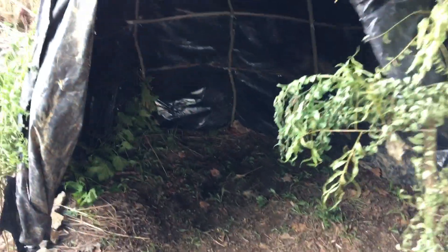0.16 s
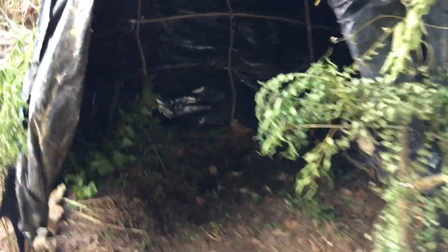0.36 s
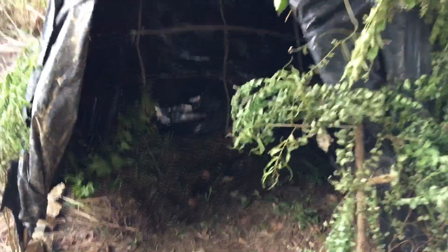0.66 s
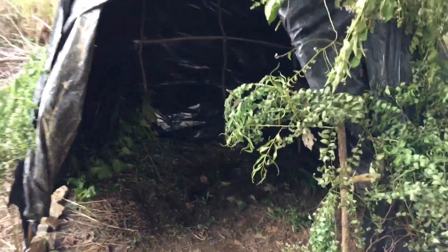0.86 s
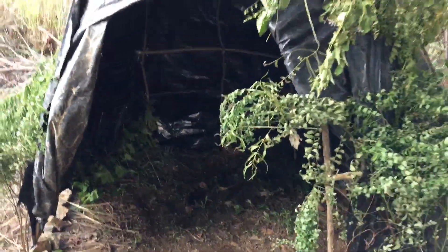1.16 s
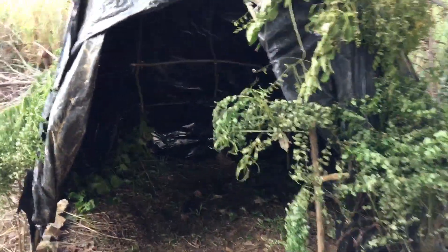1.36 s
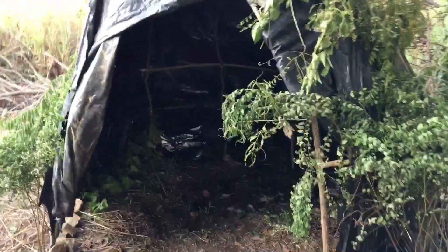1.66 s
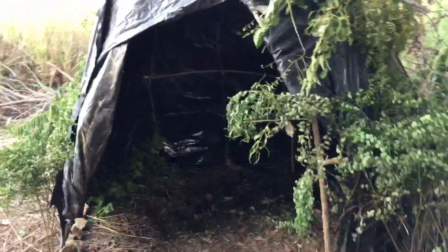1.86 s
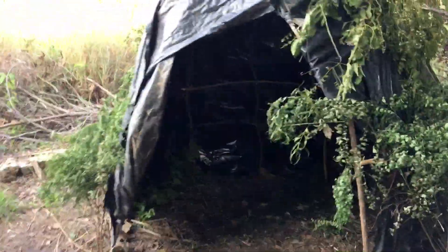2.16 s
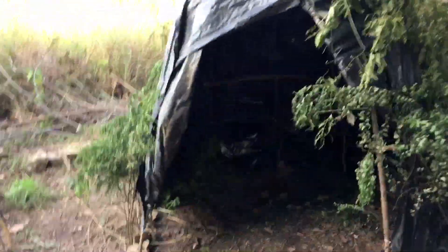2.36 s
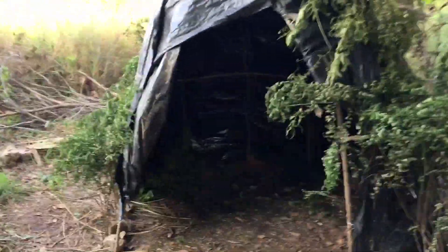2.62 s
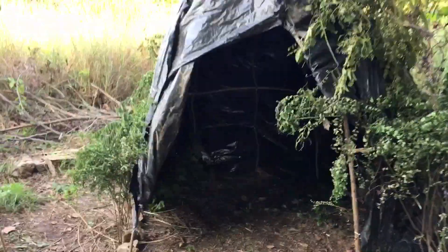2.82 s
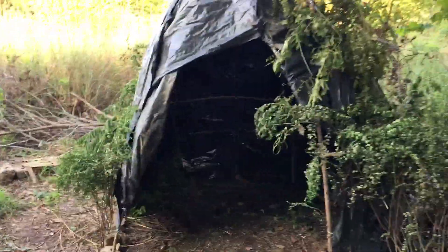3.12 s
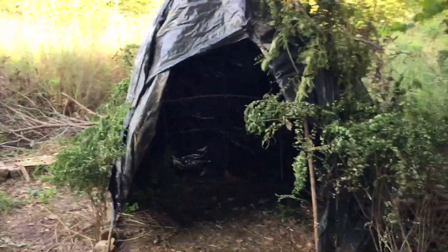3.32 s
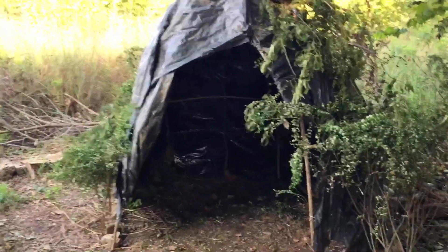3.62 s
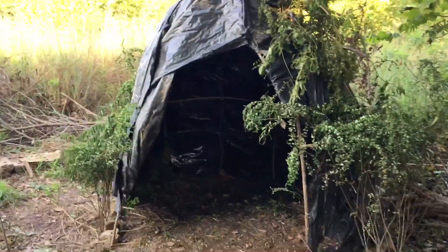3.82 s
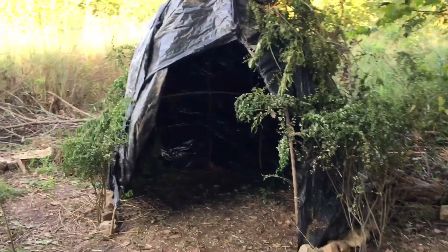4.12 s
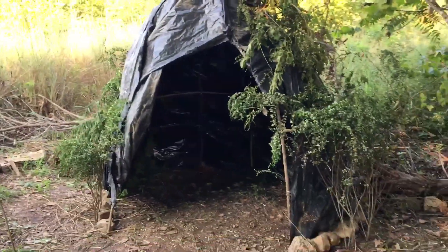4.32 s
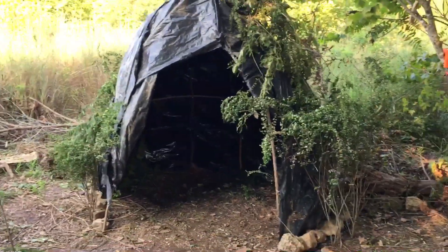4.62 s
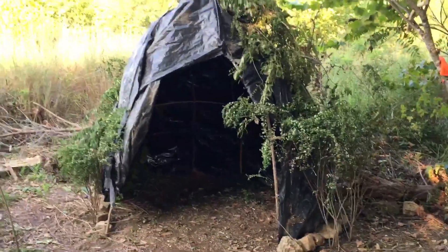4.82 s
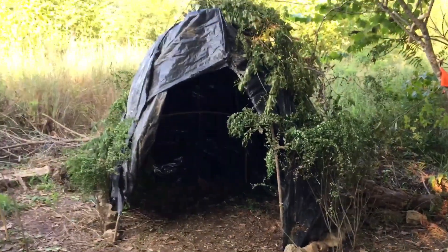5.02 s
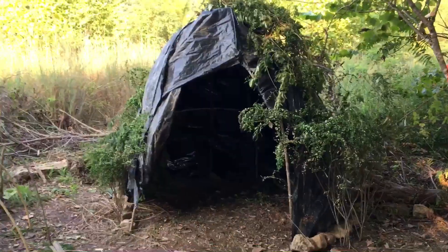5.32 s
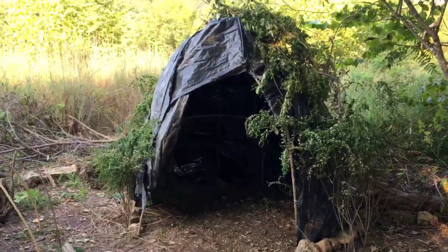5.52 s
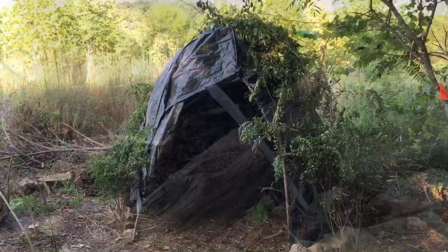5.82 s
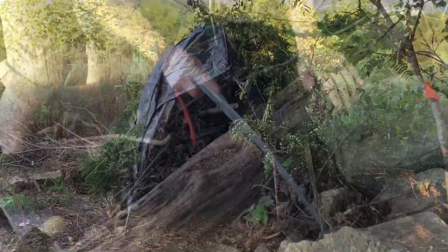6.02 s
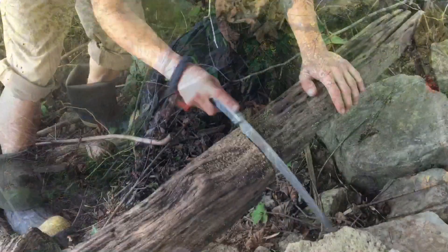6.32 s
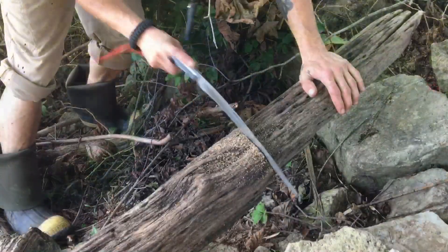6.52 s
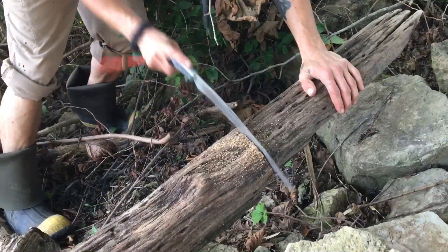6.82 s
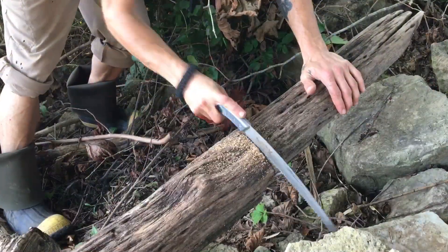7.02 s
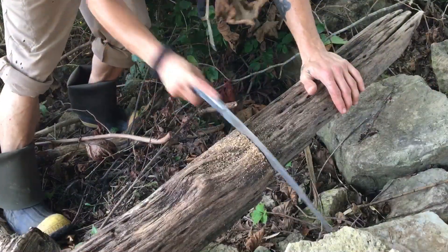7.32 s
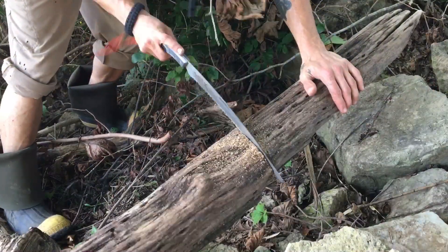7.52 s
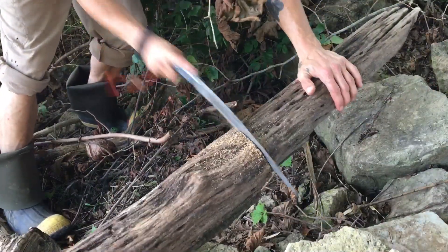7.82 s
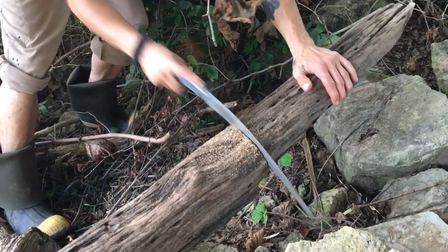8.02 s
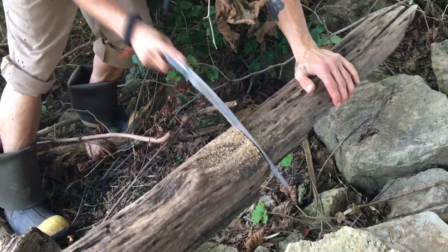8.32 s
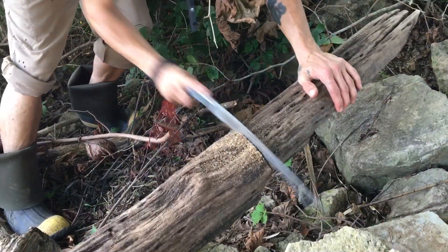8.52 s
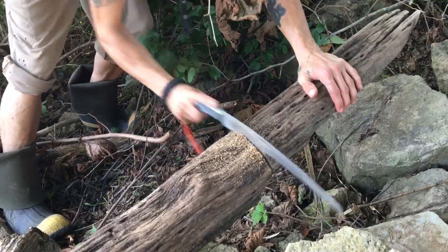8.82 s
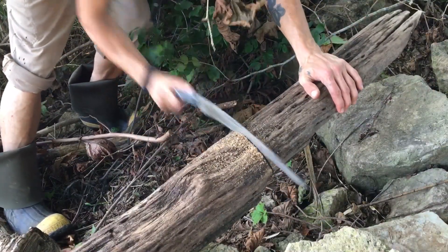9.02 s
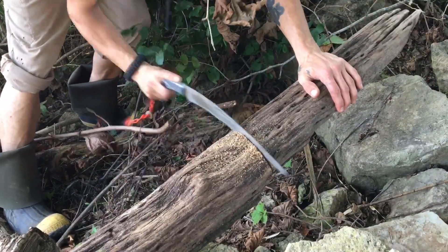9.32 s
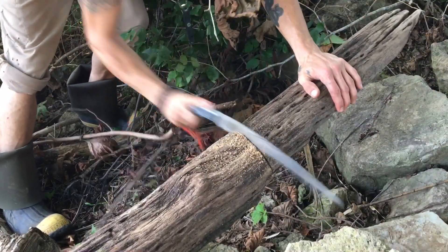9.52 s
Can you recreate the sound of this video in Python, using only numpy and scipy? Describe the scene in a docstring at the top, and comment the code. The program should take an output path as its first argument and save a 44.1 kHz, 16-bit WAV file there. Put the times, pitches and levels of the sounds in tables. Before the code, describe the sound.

A small mono microphone outdoors by a lake, little deep bass. From 0 s a shrill, steady insect chorus around 7 kHz lies over soft air rumble; dry plants swish at the start, and a breeze stirs far trees. Irregular footfalls clack on sticks and stones, clustered near 1.7 s, with dull soil thuds at 2 to 3 s. A sharp leafy swish comes at 2.45 s, a smaller one at 3.55 s. Faint hoarse birds call between 1 and 3 s. A far engine revs gently near 2.9 s, higher near 4 s, then fades. Sticks snap underfoot around 5.05 s. At 5.7 s fast sawing begins abruptly and continues to the end at about 9.6 s: strong pulls, weaker pushes, nearly six single strokes a second, gritty wood rasp, bright blade hiss, trickling sawdust, brief chattering catches and knocks, notably at 7.1 and 8.5 s. Insects and a faint low motor drone continue beneath.

```python
"""Insects shrill and dry undergrowth swishes close by: someone steps back outdoors by a lake, a far engine revs.
From 5.7 s a curved hand saw works through a weathered log, nearly three strokes there and back a second.
Teeth and torn fibres ring the log and hiss off the blade; now and then the blade knocks in the kerf.
Shaped noise, short bursts and resonances make the saw, steps, plants, insects and air; sines make the motors.
A small microphone takes it all in on one channel, without the deepest bass and the very top."""
import sys
import numpy as np
from scipy import signal
from scipy.fft import rfft, irfft
from scipy.io import wavfile
from scipy.ndimage import map_coordinates

SR = 44100
rng = np.random.default_rng(int(sys.argv[2]) if len(sys.argv) > 2 else 0)


def wav_record(signal):
    """Record a signal, one row per channel, as 16-bit PCM in the file named by sys.argv[1]."""
    frames = np.transpose(np.atleast_2d(signal))
    bounded = np.clip(frames, -1, 1)
    # unit amplitude maps onto the largest positive 16-bit level
    quanta = np.round(bounded * 32767).astype(np.int16)
    wavfile.write(sys.argv[1], SR, quanta)


N = 426006
T = np.arange(N) / SR

# Levels in the tables are those fed in, ahead of the mix gains and the microphone.
# Saw strokes, pull and push in turn: start t/s, length t/s, rasp level/dB, hiss over rasp level/dB
STROKES = [(5.68, 0.15, -35.0, 0), (5.874, 0.163, -41.5, 0.5), (6.056, 0.18, -37.0, -1.6),
           (6.263, 0.15, -36.5, -1.5), (6.418, 0.157, -31.0, -0.8), (6.598, 0.16, -37.5, -2),
           (6.753, 0.18, -32.0, -0.9), (6.965, 0.14, -34.5, -2), (7.144, 0.14, -30.5, -0.6),
           (7.312, 0.14, -38, -3.5), (7.453, 0.15, -32, -2), (7.64, 0.16, -36, -3.5),
           (7.823, 0.15, -31.5, -3), (8.019, 0.15, -39.5, -4), (8.22, 0.15, -34.5, -3.5),
           (8.4, 0.134, -34.5, -1.7), (8.543, 0.171, -30.0, -2.5), (8.718, 0.15, -38.0, 0),
           (8.886, 0.15, -30.0, -3.0), (9.064, 0.16, -37.5, 3.5), (9.235, 0.17, -31.5, 1.5),
           (9.407, 0.16, -36.5, 2.0), (9.571, 0.17, -30.5, -1)]
# Blade knocks in the kerf as it turns: t/s, level/dB, ring f/Hz, gain of that ring level/dB
KNOCKS = [(5.674, -38, 8900, 27), (5.705, -39, 2600, 4), (7.114, -29.5, 4190, 17), (7.803, -40.5, 4320, 5),
          (8.524, -22, 2435, -7), (8.752, -43, 11500, 24)]
# Teeth catch on hard wood and the blade chatters: t/s, length t/s, f/Hz, level/dB
CATCHES = [(6.465, 0.027, 1553, -34), (7.168, 0.0088, 1091, -31.5), (7.18, 0.032, 1795, -26.5),
           (7.858, 0.043, 2045, -29.5), (8.27, 0.031, 2082, -35), (8.596, 0.015, 1800, -28),
           (8.988, 0.031, 997, -34.5), (9.285, 0.027, 1505, -32)]
# Ringing of log and blade: f/Hz, width f/Hz, level over the broad response/dB
SAW_MODES = [(389, 61, 1), (815, 83, -1), (991, 63, 6), (1360, 58, -9), (1900, 67, -7), (2600, 44, -3),
             (3570, 24, 3.5), (3930, 103, -1), (4500, 160, -10), (5740, 270, -7.5), (8320, 680, -8),
             (9550, 280, -11)]
# Broad response of the log, then of the blade: f/Hz, relative level/dB
LOG_RESPONSE = [(120, -16.5), (220, -6.5), (370, -5.5), (560, -7.5), (900, -6), (1200, -6.5), (1480, -0.5),
                (2100, -2.5), (2800, -3), (3600, -8), (5000, -17.5), (15000, -54)]
BLADE_RESPONSE = [(1200, -37), (3000, -9.5), (4200, -0.5), (5000, -3), (6300, 3.5), (8000, -2), (9400, 2.5),
                  (10400, -1), (11500, 3.5), (15500, -4)]
# Tone of the sawdust: f/Hz, relative level/dB; then its course: t/s, level/dB
DUST_TONE = [(200, -3.0), (1500, 1.0), (4000, -4.0), (15000, -6)]
DUST_COURSE = [(5.7, -52.5), (6.4, -52), (7.6, -53.5), (9.6, -49)]
# Footfalls on loose sticks and stones: t/s, level/dB, centre f/Hz, width f/Hz, decay t/s
STEPS = [(0.186, -53, 1200, 1500, .006), (0.436, -39.5, 745, 1400, 0.0022), (0.571, -50, 685, 630, 0.018),
         (0.597, -45, 2400, 1800, 0.0039), (1.012, -48.5, 600, 600, 0.0056), (1.566, -50, 530, 700, 0.027),
         (1.723, -34, 740, 900, 0.0024), (1.752, -37.5, 706, 1090, 0.0036),
         (1.768, -37.5, 680, 1000, 0.0032), (1.788, -36.5, 700, 1000, 0.0024),
         (1.953, -42, 360, 400, 0.0087), (2.363, -51, 670, 300, 0.011), (2.795, -44.5, 1160, 1000, 0.0042),
         (2.843, -34.5, 604, 190, 0.0091), (3.053, -48.5, 2900, 3000, 0.0068),
         (3.128, -38.5, 647, 190, .005), (3.181, -41.5, 2800, 1400, 0.0043),
         (3.843, -51.5, 1070, 300, 0.0054), (4.004, -49, 2680, 700, 0.0034),
         (4.064, -45.5, 2500, 1500, 0.0037), (4.142, -47.5, 540, 348, 0.018),
         (4.725, -43.5, 695, 250, 0.0068), (4.804, -47, 754, 348, 0.0075), (4.97, -48, 650, 600, 0.0078),
         (5.03, -34.5, 860, 2200, 0.0064), (5.096, -33.5, 550, 900, 0.012), (5.143, -44.5, 706, 990, .016)]
# Heavy footing on soil: t/s, level/dB, starting f/Hz
THUDS = [(1.958, -41, 125), (2.419, -36, 65), (2.85, -46.5, 250), (3.111, -45.5, 190), (5.031, -47.5, 256),
         (5.099, -52, 300), (5.746, -39, 186), (5.976, -38, 160), (6.01, -38, 130), (7.994, -40.5, 200)]
# Dry sticks snap underfoot: t/s, level/dB, decay t/s
SNAPS = [(5.029, -40.5, 0.013), (5.096, -38.5, 0.013)]
# Tone of a snapping stick: f/Hz, relative level/dB
STICK_TONE = [(200, 6), (900, -7), (3500, 0), (6000, -8.0), (10000, -5.5), (15500, -9)]
# Dry plants swish past the legs: peak t/s, level/dB, rise t/s, fall t/s
SWISHES = [(.03, -53.5, .2, 0.082), (.42, -64.5, 0.017, .012), (.61, -70, 0.045, .05),
           (.98, -69, .025, 0.066), (1.84, -63, 0.059, 0.085), (2.447, -42.5, 0.029, 0.033),
           (2.7, -68, 0.057, 0.12), (2.85, -66, 0.075, 0.068), (3.33, -65, 0.26, 0.11),
           (3.555, -51.5, .07, 0.032), (4.08, -65.5, 0.052, 0.083), (4.26, -64, 0.061, 0.077),
           (4.44, -62.5, 0.082, 0.064), (5.04, -61, .01, .025), (5.11, -61, .015, 0.042)]
# Tone of the dry leaves: f/Hz, relative level/dB
LEAF_TONE = [(150, 1), (500, -3.5), (1200, -3), (2400, 1), (4000, -1), (6500, -1.5), (10000, -7),
             (15500, -13)]
# Fine grass heads whisk past: t/s, length t/s, f/Hz, level/dB
WHISKS = [(0, 0.18, 12500, -55.5), (4.002, .012, 12500, -55), (4.04, .045, 12500, -63),
          (4.38, 0.14, 12000, -57)]
# Mid-pitched bands of noise that swell within the swishes: t/s, length t/s, f/Hz, level/dB
SWISH_BANDS = [(0, 0.089, 1480, -52), (1.81, .07, 3740, -62), (2.42, 0.053, 2370, -42.5),
               (3.53, 0.033, 2690, -55)]
# Tone of the insect chorus: f/Hz, relative level/dB; then its course: t/s, level/dB
CHORUS_TONE = [(4500, -28.5), (6150, -16.5), (6550, -1.5), (6950, 4), (7600, 2), (8100, -5.5),
               (8700, -15.5), (10000, -30.5), (12000, -69)]
CHORUS_COURSE = [(0, -52.5), (3, -50.0), (5.6, -50.5), (5.8, -49.5), (9.6, -54.0)]
# Far birds: t/s, length t/s, f/Hz, level/dB
FAR_CALLS = [(1.14, 0.08, 1520, -59.5), (1.36, 0.097, 2200, -66.5), (2.12, .04, 2630, -65),
             (2.667, 0.026, 2000, -56), (2.681, 0.089, 1570, -62), (2.888, 0.046, 1600, -70)]
# Throttle blips of the far engine: peak t/s, firing rate gained f/Hz, run-up t/s, run-down t/s
REVS = [(2.899, 11, .32, .33), (4.029, 62, 0.34, .52)]
# Partials of the far engine: multiple of the firing rate, level/dB
ENGINE_ORDERS = [(1, 4), (1.5, -5), (2, -3.5), (3, -13)]
# Path from the far engine to the microphone: f/Hz, level/dB
ENGINE_PATH = [(50, 4), (72, -6.5), (92, 3.5), (125, -7.5), (160, 6), (210, -1), (255, 2.5), (330, -10.5),
               (500, -5)]
# Lines of a motor across the lake: f/Hz, level/dB
DRONE = [(105, -64), (156, -54.5), (208, -57.5)]
# Tone of air and far traffic: f/Hz, relative level/dB; then its course: t/s, level/dB
AIR_TONE = [(20, -45), (32, -4), (50, 2.5), (90, 3.5), (160, -3.5), (280, -12.5), (500, -21), (1100, -24.5),
            (2200, -31.5), (4000, -33), (10000, -40), (14000, -33)]
AIR_COURSE = [(0, -55), (2, -54.5), (4, -51.0), (5.6, -54.5), (5.7, -46.5), (9.6, -49.5)]
# Gusts in far trees: peak t/s, level/dB, rise t/s, fall t/s
GUSTS = [(.02, -52, 0.22, .22), (1.1, -64.5, 0.77, 0.52), (5.02, -60, 0.2, .75)]
# Tone of the far trees: f/Hz, relative level/dB
TREE_TONE = [(200, -19.0), (340, 3.5), (450, -6), (620, 1.5), (850, -4.5), (1100, -2), (1500, -2.0),
             (2200, -17), (6000, -33)]
# Tone of the far road: f/Hz, relative level/dB; then its course: t/s, level/dB
ROAD_TONE = [(250, -19), (480, 4), (660, 14.0), (820, -17.0), (1500, -32)]
ROAD_COURSE = [(1.5, -78), (2.7, -72.5), (3.6, -66.5), (4.2, -63.5), (5.2, -90.0)]

SAW_START_S = 5.672
# share of the stroke at which the arm is fastest: a pull starts with a jerk, a push builds up
PULL_TOP, PUSH_TOP = .44, .58
# change of the hiss from the start of a stroke to its end
PULL_BRIGHTEN_DB, PUSH_BRIGHTEN_DB = -2, 0.5
WING_HZ = 79.5  # mean pulse rate of the buzzing insect
IDLE_HZ, IDLE_DB = 66, -51.5  # far engine: firing rate and level at idle
ENGINE_FROM_S, ENGINE_UNTIL_S, ENGINE_FADE_DB_PER_S = 2.38, 4.34, 21  # it carries to the shore for a while
# louder under load; the throttle opens before the speed follows
LOAD_DB_PER_HZ_S, THROTTLE_LEAD_S = 0.0336, .11
TOP_HZ = 15800  # upper limit of the recorder


def saw():
    """Teeth, tearing fibres and side friction drive the log's rasp and the blade's hiss."""
    speed, rasp_db, hiss_db = arm()
    snaps, tearing = teeth(speed)
    grain_db = 0.76 * walk(70)  # hard and soft growth rings
    bite = 0.31 * snaps + .5 * tearing * noise() + .5 * noise()
    rub = 0.16 * snaps + 0.67 * tearing * noise() + 0.7 * noise()
    slaps, knock_rings = knocks()
    # the hiss dies sooner than the rasp as the blade slows
    push = speed ** 1.22 * undb(rasp_db + grain_db + 0.27 * walk(110))
    slide = speed ** 1.25 * undb(hiss_db + grain_db)
    low_fibres = splinters(260, 1986, 1.176, 0.0029, 5.5)
    high_fibres = splinters(260, 8000, 1.8, 0.0052, 9.4)
    rasp = colour(bite * push + slaps, LOG_RESPONSE) + undb(-9.0) * push * low_fibres
    hiss = colour(rub * slide + 0.81 * slaps, BLADE_RESPONSE) + undb(-9.0) * slide * high_fibres
    drive = free_blade(rasp + hiss) + sawdust()
    ring = sum(undb(db) * band(drive, hz, width) for hz, width, db in SAW_MODES)
    return undb(-0.48) * (drive + ring) + knock_rings + swells(CATCHES, width=880)


def arm():
    """Blade speed (0-1), rasp level and hiss level over time: each stroke is half a swing of the arm."""
    speed, rasp_db, hiss_db = np.zeros((3, N))
    for k, (start, length_s, db, bright_db) in enumerate(STROKES):
        is_push = k % 2
        top = PUSH_TOP if is_push else PULL_TOP
        brighten_db = PUSH_BRIGHTEN_DB if is_push else PULL_BRIGHTEN_DB
        i = slice(int(start * SR), int((start + length_s) * SR))
        along = (T[i] - start) / length_s
        speed[i] = np.sin(np.pi * np.interp(along, [0, top, 1], [0, .5, 1]))
        rasp_db[i] = db
        hiss_db[i] = db + bright_db + brighten_db * (along - .5)
    return np.abs(speed), rasp_db, hiss_db


def teeth(speed, top_rate=620, jitter=.16, scatter_db=4.0, bite=0.76):
    """Each tooth bites and tears a tuft of fibres; teeth pass faster with blade speed."""
    passed = np.cumsum(speed * top_rate * np.exp(jitter * walk(300))) / SR
    tooth = passed.astype(int)
    depth = undb(scatter_db * np.minimum(noise()[tooth], 2))  # one draw per tooth
    snaps = unit(np.diff(tooth, prepend=0) * depth) * np.sqrt(np.mean(speed > 0))
    tearing = depth * np.exp(-(passed % 1) / bite)
    tearing /= np.sqrt(np.mean(tearing[speed > 0] ** 2))
    return snaps, tearing


def knocks():
    """The blade slaps the kerf wall in a short chattering contact and rings."""
    slaps, rings = np.zeros((2, N))
    for s, db, hz, ring_db in KNOCKS:
        contact = undb(db) * burst(0.0033)
        add(slaps, s, contact)
        add(rings, s, undb(ring_db) * band(contact, hz, 270))
    return slaps, rings


def splinters(rate, hz, octaves, ring_s, spread_db, size=512):
    """Fibres or stems snap and ring briefly, rate a second, each at its own pitch near hz."""
    when, pitch, force, phase = rng.random((int(rate * N / SR), 4)).T[:, :, None]
    t = T[:size]
    pitch_hz = np.minimum(hz * 2 ** (octaves * (pitch - .5)), SR / 3)
    strength = undb(spread_db * force) * np.sign(phase - .5)
    rings = strength * np.exp(-t / ring_s) * np.sin(2 * np.pi * pitch_hz * t)
    places = (when * N).astype(int) + np.arange(size)
    return unit(np.bincount(places.ravel(), rings.ravel(), N)[:N])


def sawdust():
    """Grains of sawdust keep trickling between strokes."""
    dust = colour(crackle(2500, 0.51), DUST_TONE)
    return dust * (T > SAW_START_S) * undb(course(DUST_COURSE))


def free_blade(x, short_s=0.000697, long_s=.0021, echo=0.081):
    """Waves return from the blade's tip; the free length changes with every stroke, so the ringing sweeps."""
    ends = np.ravel([(start, start + length_s) for start, length_s, *_ in STROKES])
    # 0 and 1 are the two ends of the travel
    reach = np.interp(T, np.sort(ends), (np.arange(len(ends)) + 1) // 2 % 2)
    delay = (short_s + (long_s - short_s) * np.sin(np.pi / 2 * reach) ** 2) * SR
    trips = [(-echo) ** k * map_coordinates(x, [np.arange(N) - k * delay], order=3) for k in (1, 2)]
    return (x + sum(trips)) / np.sqrt(1 + echo ** 2)


def footsteps():
    """Sticks and stones clack under the boots as damped resonances; the soil thuds with sinking pitch."""
    out = np.zeros(N)
    for s, db, hz, width, decay_s in STEPS:
        contact = 1.11 * burst(decay_s)
        contact[0] += 0.19 * np.sqrt(decay_s * SR)  # stress on the first touch
        clack = band(band(contact, hz, width), hz, 0.78 * width) * np.sqrt(SR / width)
        ground = band(band(contact, 380, 400), 360, 600)
        add(out, s, undb(db) * (0.66 * clack + 0.54 * ground + 0.054 * contact))
    t = T[:SR // 4]
    for s, db, hz in THUDS:
        swell = t / 0.0027 * np.exp(1 - t / 0.0042)
        add(out, s, undb(db) * swell * np.sin(2 * np.pi * hz * t * (1 - 0.71 * t)))
    return out


def sticks():
    """A breaking stick gives a sharp crack of noise that splinters away."""
    out = np.zeros(N)
    for s, db, decay_s in SNAPS:
        add(out, s, undb(db) * burst(decay_s))
    return colour(out, STICK_TONE)


def undergrowth():
    """Dry leaves slide in uneven swishes while thin stems tick; narrower bands of noise swell with them."""
    gain = surges(SWISHES) * undb(1.1 * walk(90))
    leaves = colour(1.02 * noise() + 0.78 * crackle(1800, 5.5), LEAF_TONE)
    stems = splinters(160, 2684, 1.37, 0.0025, 16)
    swishes = gain * (undb(4.5) * leaves + undb(-0.5) * stems)
    return swishes + swells(WHISKS, width=8000) + swells(SWISH_BANDS, width=900)


def insects():
    """A shrill chorus of shaped noise, one pulsing buzz below it and two thin far singers."""
    chorus = colour(noise(), CHORUS_TONE) * undb(0.48 * walk(9) + course(CHORUS_COURSE))
    wings = 0.76 + 0.31 * np.cos(2 * np.pi * np.cumsum(WING_HZ + 0.5 * walk(2.8)) / SR)
    buzz = unit(band(band(noise(), 5700, 550), 5500, 550) * wings) * undb(-69.5 + 2.0 * walk(2.43))
    thin = sum(unit(band(band(noise(), hz, 280), hz, 280)) * undb(2 * walk(18)) for hz in (3810, 4660))
    return chorus + buzz + thin * undb(course([(4.9, -87), (5.3, -80)]))


def birds():
    """Faint hoarse calls from far off, each a swell of resonant noise."""
    return swells(FAR_CALLS, width=690)


def engines():
    """Partials of a far engine's firing rate rise and fall; later a motor drones across the water."""
    firing_hz, engine_db = throttle()
    turn = 2 * np.pi * np.cumsum(firing_hz * (1 + 0.0222 * walk(25))) / SR
    path_hz, path_db = np.transpose(ENGINE_PATH)
    revs = np.zeros(N)
    for multiple, order_db in ENGINE_ORDERS:
        level_db = order_db + np.interp(multiple * firing_hz, path_hz, path_db) + 2.0 * walk(15)
        revs += undb(level_db) * np.sin(multiple * turn)
    drone = np.zeros(N)
    for hz, db in DRONE:
        drone += undb(db + 3.7 * walk(8)) * np.sin(2 * np.pi * hz * T + 1.66 * walk(9))
    return revs * undb(engine_db) + drone * (T > SAW_START_S)


def throttle():
    """Firing rate and level of the far engine: each blip lifts it from idle, and load makes it louder."""
    firing_hz = np.full(N, float(IDLE_HZ))
    for s, gain_hz, up_s, down_s in REVS:
        firing_hz += gain_hz * np.exp(-((T - s) / np.where(T < s, up_s, down_s)) ** 2)
    load = np.interp(T + THROTTLE_LEAD_S, T, np.gradient(firing_hz) * SR)  # Hz per second
    outside_s = np.abs(T - np.clip(T, ENGINE_FROM_S, ENGINE_UNTIL_S))
    return firing_hz, IDLE_DB + LOAD_DB_PER_HZ_S * load - ENGINE_FADE_DB_PER_S * outside_s


def air():
    """Shaped noise: low rumble, stronger at the shore, a breeze in far trees and the rush of a far road."""
    rumble = colour(noise(), AIR_TONE) * undb(1.0 * walk(5.7) + course(AIR_COURSE))
    trees = colour(noise(), TREE_TONE) * surges(GUSTS)
    road = colour(noise(), ROAD_TONE) * undb(course(ROAD_COURSE) + 2.0 * walk(16))
    return rumble + road + trees


def swells(rows, width):
    """Short swells of one noisy resonance; rows are t/s, length t/s, f/Hz, level/dB."""
    out = np.zeros(N)
    for s, length_s, hz, db in rows:
        shape = np.hanning(int(length_s * SR)) ** .5
        tone = unit(band(band(rng.standard_normal(len(shape)), hz, width), hz, width))
        add(out, s, undb(db) * shape * tone)
    return out


def surges(rows):
    """Gain of overlapping exponential surges; rows are peak t/s, level/dB, rise t/s, fall t/s."""
    power = np.zeros(N)
    for s, db, rise_s, fall_s in rows:
        away = np.maximum((s - T) / rise_s, (T - s) / fall_s)
        power += (undb(db) * np.exp(-np.minimum(away, 20))) ** 2
    return np.sqrt(power)


def crackle(rate, spread_db):
    """Random tiny fractures, about rate a second, of unequal size."""
    size = undb(spread_db * np.minimum(rng.exponential(size=N), 4))
    return unit((rng.random(N) < rate / SR) * size * np.sign(noise()))


def burst(decay_s, size=8192):
    """A contact that chatters as noise and dies away."""
    return rng.standard_normal(size) * np.exp(-np.arange(size) / SR / decay_s)


def band(x, hz, width):
    """One resonance, gain 1 at its centre."""
    return signal.lfilter(*signal.iirpeak(hz, hz / width, fs=SR), x)


def colour(x, points, size=8192):
    """Causal minimum-phase filter of unit power through (f/Hz, level/dB) points."""
    hz, db = np.transpose(points)
    grid = np.arange(size // 2 + 1) * SR / size + 1
    cepstrum = irfft(np.log(undb(np.interp(np.log(grid), np.log(hz), db))))
    # folding the cepstrum forward puts the energy as early as possible
    cepstrum[1:size // 2] *= 2
    cepstrum[size // 2 + 1:] = 0
    response = irfft(np.exp(rfft(cepstrum)))[:size // 2]
    return signal.oaconvolve(x, response / np.linalg.norm(response))[:len(x)]


def noise():
    """White noise."""
    return rng.standard_normal(N)


def walk(rate):
    """Random drift of about rms 1 through rate new values a second."""
    return np.interp(T * rate, np.arange(N // 20), rng.standard_normal(N // 20)) * np.sqrt(3 / 2)


def course(points):
    """Level in dB along straight lines through (t/s, level/dB) points."""
    return np.interp(T, *np.transpose(points))


def undb(db):
    """Decibels to gain."""
    return 10 ** (np.asarray(db) / 20)


def unit(x):
    """Scale to rms 1."""
    return x / np.sqrt(np.mean(x ** 2) + 1e-18)


def add(out, s, x):
    """Mix x in at time s."""
    i = int(s * SR)
    out[i:i + len(x)] += x[:len(out) - i]


def scene():
    """All sources in the open air, one channel."""
    walker = footsteps() + sticks() + undergrowth()
    return (saw() + walker + insects() + birds() + engines() + air())[None]


def record(dry):
    """The small microphone loses the deepest bass; the recorder cuts the top."""
    thinned = signal.sosfilt(signal.butter(4, 36, "high", fs=SR, output="sos"), dry)
    return signal.sosfilt(signal.ellip(10, .2, 70, TOP_HZ, fs=SR, output="sos"), thinned)


dry = scene()
out = record(dry)
wav_record(out)
```